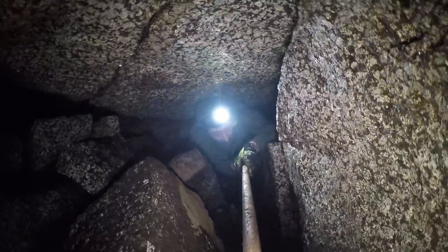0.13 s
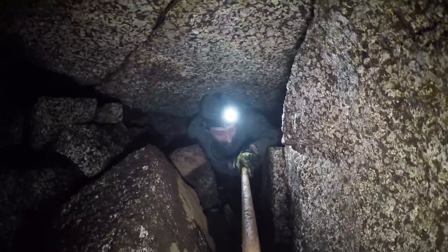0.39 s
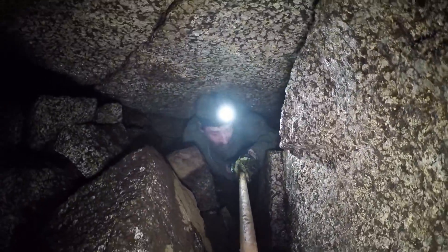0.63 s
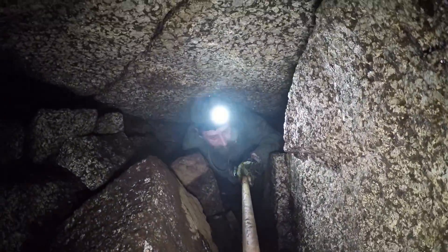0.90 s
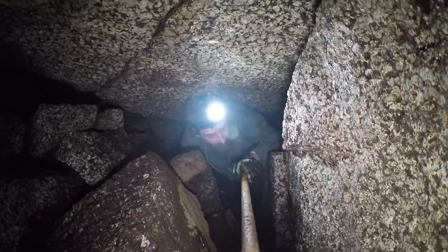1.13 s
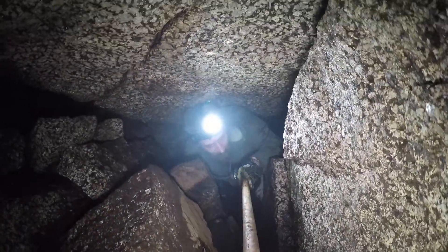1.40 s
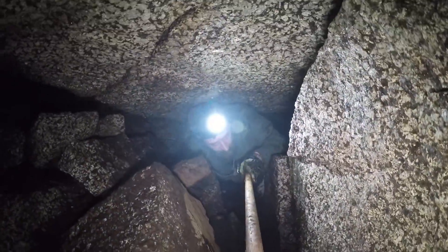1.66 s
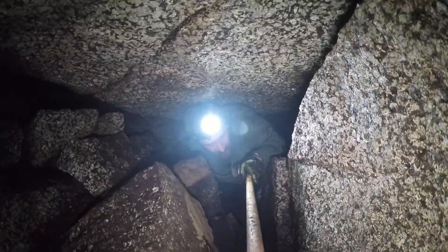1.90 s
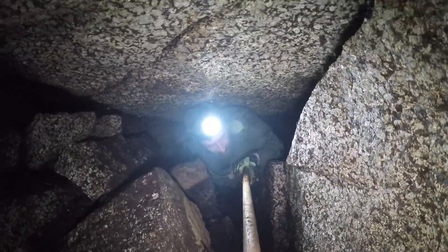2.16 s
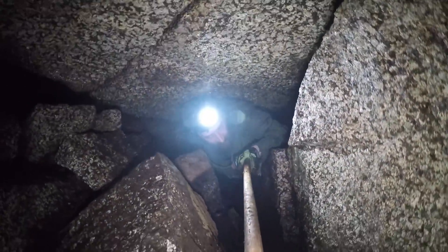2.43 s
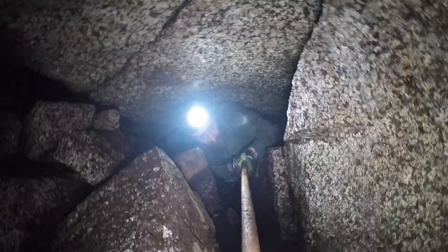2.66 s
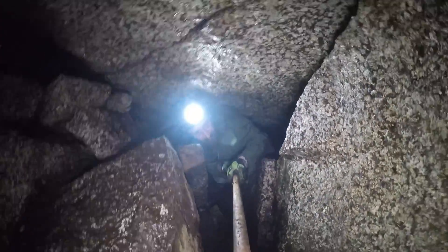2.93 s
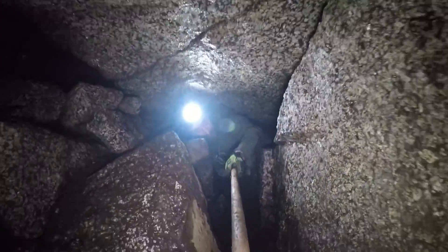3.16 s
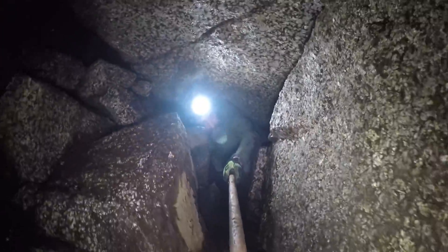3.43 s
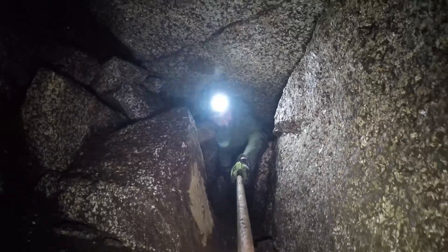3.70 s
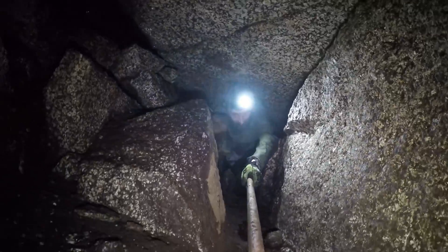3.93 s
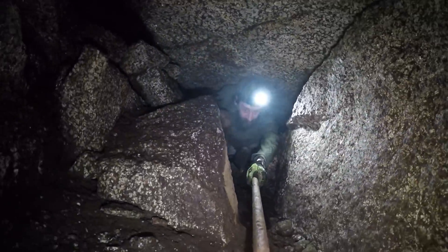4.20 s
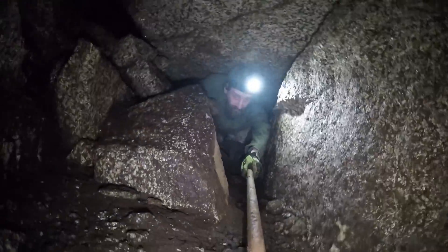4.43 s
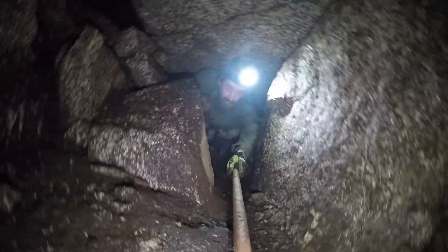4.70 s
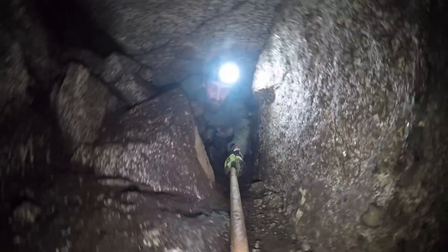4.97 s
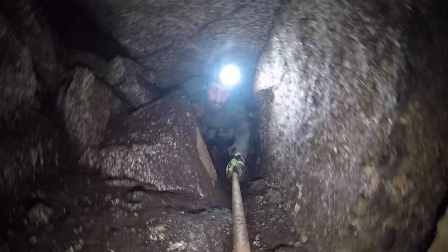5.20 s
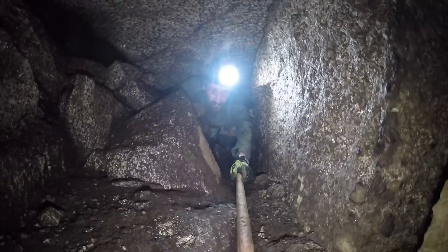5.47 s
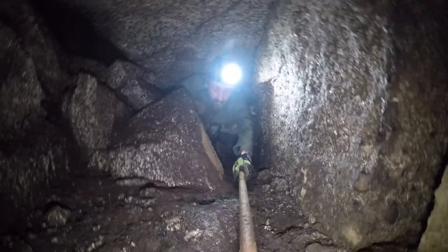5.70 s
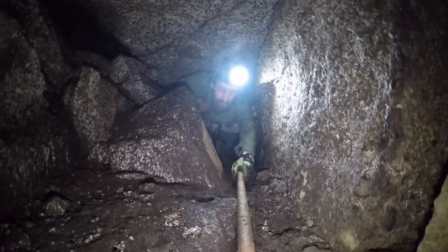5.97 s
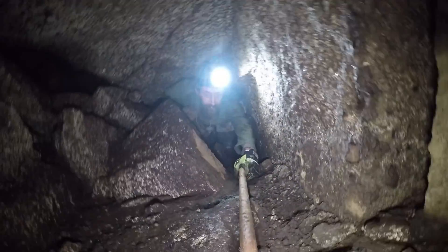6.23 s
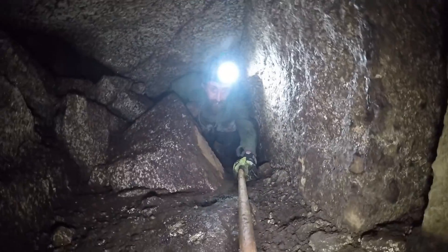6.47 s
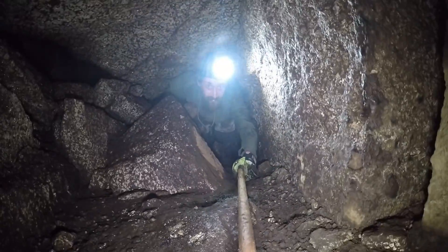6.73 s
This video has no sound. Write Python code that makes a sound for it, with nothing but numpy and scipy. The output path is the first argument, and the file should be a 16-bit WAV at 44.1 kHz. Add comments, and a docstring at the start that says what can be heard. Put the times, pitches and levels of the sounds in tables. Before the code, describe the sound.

Low pole rumble and muffled cloth scraping on rock in a cave, with scattered dull taps, then hard hollow knocks after four and a half seconds.

```python
"""A small camera on a hand-held pole is pushed through a tight rock passage, its microphone right at the rock.
Hiss swells in first, under the low sway and hum of the pole, the glove rubbing along it and clothing on stone;
all four go on throughout, as wavering tones and as lumpy, filtered noise. From the first second
blows ring the modes of pole, camera shell and fittings, some with noise bursts, chatter or judder; the hardest
come after four and a half seconds, the last ones near the end. Gain control ducks the sound after loud peaks."""
import sys
import numpy as np
from scipy import signal
from scipy.fft import rfft, irfft
from scipy.io import wavfile
from scipy.ndimage import uniform_filter1d

SR = 44100
rng = np.random.default_rng(int(sys.argv[2]) if len(sys.argv) > 2 else 0)


def volts_from_decibels(level):
    """Turn decibel levels (scalar or array-like) into linear amplitude factors."""
    exponent = np.asarray(level, float) / 20
    return 10 ** exponent


def inscribe(sig):
    """Save sig as 16-bit PCM at rate SR to the path in sys.argv[1].

    A 1-D sig is mono; a 2-D sig holds one channel per row.
    Samples are clipped to [-1, 1] before scaling.
    """
    pcm = np.round(np.clip(np.atleast_2d(sig).T, -1, 1) * 32767)
    wavfile.write(sys.argv[1], SR, pcm.astype(np.int16))


N = 302526

# bending modes of the pole: f/Hz, relative level/dB, t60/s
POLE_MODES = [(65, 0, .5), (103, -3, .16)]
# modes of the camera shell on its mount: f/Hz, relative level/dB, t60/s
SHELL_MODES = [(113, 8, 0.059), (175.5, -3, 0.16), (290.8, 1.5, 0.073), (342, 3.5, 0.043),
               (493, -11, 0.033), (660, 2, 0.04), (767, -1.5, 0.038), (1078, -0.5, .03), (1374, 2.5, 0.011),
               (1670, 1.5, 0.0088), (2300, -23, 0.018)]
# modes of clamp and screw: f/Hz, relative level/dB, t60/s
FITTING_MODES = [(1500, -5, .005), (2300, -7, .005), (3600, -7, .03), (3820, -7, .02), (4165, 2, .022),
                 (4460, 3, .02), (4900, -3, .015), (5700, -6, .012), (7000, -6, .012), (8390, 1, .015),
                 (8950, -3, .01), (12000, -13, .0015)]


def evened(x):
    """Scales to rms 1."""
    return x / np.sqrt(np.mean(x ** 2) + 1e-20)


def column(table, count):
    """One control of a curve table, drawn straight from row to row, sample by sample."""
    rows = np.array(table)
    return np.interp(np.arange(N) / SR, rows[:, 0], rows[:, count])


def coloured(x, points):
    """Filters x through a curve of (f/Hz, relative level/dB) points and evens it to rms 1."""
    f, db = np.transpose(points)
    hz = np.fft.rfftfreq(N, 1 / SR)
    curve_db = np.interp(np.log(hz + 1), np.log(f + 1), db)
    return evened(irfft(rfft(x) * volts_from_decibels(curve_db), N))


def drift(hz):
    """Slow chance of rms 1: noise that falls away above hz."""
    return coloured(rng.standard_normal(N), [(0, 0), (hz, 0), (2 * hz, -40), (SR, -200)])


def grit(per_s, spread_db, smooth):
    """Stick-slip: sparse catches of uneven size over a share of smooth sliding noise."""
    size = volts_from_decibels(spread_db * np.minimum(rng.exponential(1, N), 4))
    catches = size * rng.choice([-1., 1.], N) * (rng.random(N) < per_s / SR)
    return smooth * rng.standard_normal(N) + (1 - smooth) * evened(catches)


def strokes(table, count):
    """Gain through all strokes (start, length, ..): each swells, still gains a little, then dies away."""
    swell_share, rise_db = 0.35, 1  # share of the length spent swelling; further rise over the length
    die_s, die_share = 0.014, 0.083  # the dying takes a fixed time plus a share of the length
    t, power = np.arange(N) / SR, np.zeros(N)
    for row in table:
        u, length = t - row[0], row[1]
        swell = np.sin(np.pi / 2 * np.clip(u / (swell_share * length), 0, 1))
        rising = volts_from_decibels(row[count] + rise_db * np.clip(u / length, 0, 1))
        die = np.exp(-np.maximum(u - length, 0) / (die_s + die_share * length))
        power += (rising * swell * die) ** 2
    return np.sqrt(power)


def ringing(modes, seconds, spot=0, contact_s=0):
    """Decaying sines of a body after one tap, peak 1; the struck spot weights and slightly detunes each."""
    t = np.arange(int(seconds * SR)) / SR
    hz, db, t60 = np.transpose(modes)[:, :, None]
    spot = (spot * np.ones(12))[:len(modes), None]
    softening_db = -0.1 * hz * contact_s  # the longer the contact, the weaker the high modes
    mode_gain = volts_from_decibels(db + softening_db + 3 * spot - 60 * t / t60)
    y = (mode_gain * np.sin(2 * np.pi * hz * (1 + .005 * spot) * t)).sum(0)
    return y / abs(y).max()


def hum(hz, waver, waver_hz, throb_db):
    """A mode kept going by a trembling hand: its pitch wavers and its strength throbs."""
    turns = np.cumsum(hz * (1 + waver * drift(waver_hz))) / SR
    return np.sqrt(2) * volts_from_decibels(throb_db * drift(25.3)) * np.sin(2 * np.pi * turns)


def hiss():
    """Steady coloured noise under everything, swelling in at first."""
    # colour of the hiss: f/Hz, relative level/dB
    hiss_colour = [(180, -1), (300, -3.5), (1110, -16), (1670, -19.5), (10100, -29.5), (13800, -39),
                   (15000, -64)]
    level_db, start_db, swell_s = -50, -3.5, 0.51
    swell_db = start_db * np.exp(-np.arange(N) / SR / swell_s)
    return volts_from_decibels(level_db + swell_db) * coloured(rng.standard_normal(N), hiss_colour)


def shake():
    """The long pole in the hand sways, wobbles and bends: three low tones at its lowest modes."""
    # the pole in the hand: t/s, sway level/dB, wobble f/Hz, wobble level/dB, bending hum level/dB
    hand_curve = [(0.0, -46.5, 32.9, -37, -47), (0.88, -32.5, 29.34, -39, -51.5),
                  (1.51, -47, 31.3, -27.5, -39.5), (1.72, -26, 23.76, -36, -39.5),
                  (2.52, -44, 30.45, -29.5, -38.5), (2.98, -21.5, 25.95, -23.5, -32),
                  (3.36, -24, 30.7, -11, -38), (3.72, -26.5, 30.12, -23.5, -35.5),
                  (4.18, -28.5, 33.36, -30.5, -36), (4.76, -30.5, 31.1, -16.5, -31.5),
                  (4.93, -25, 25.44, -36, -37.5), (5.08, -18.5, 26.1, -38, -45),
                  (5.27, -29, 32.65, -24, -34.5), (5.67, -34, 36.85, -32, -21.5),
                  (5.92, -20, 25.66, -24, -24.5), (6.23, -36, 25.38, -45, -35),
                  (6.46, -16, 24.85, -21, -32.5), (6.86, -27, 25.3, -35, -37)]
    sway = volts_from_decibels(column(hand_curve, count=1)) * hum(14, .3, 4, 3.5)
    wobble = volts_from_decibels(column(hand_curve, count=3)) * hum(column(hand_curve, count=2), 0.059, 4.3, 2.6)
    bend = volts_from_decibels(column(hand_curve, count=4)) * hum(POLE_MODES[0][0], 0.0738, 11.82, 3.9)
    return sway + wobble + bend


def drag(count):
    """Level of one cloth layer (1 swish, 2 body, 3 fold): the steady rustle plus the drags."""
    # clothing that keeps rustling: t/s, swish level/dB, dull body level/dB, hollow fold level/dB
    rustle_curve = [(0.0, -75, -63, -85), (.5, -76, -48.5, -62), (1.0, -67, -60.5, -87),
                    (2.0, -57.5, -51.5, -73), (2.7, -61, -51, -75), (3.4, -62.5, -43.5, -73),
                    (3.7, -69.5, -60, -82), (4.2, -61.5, -66, -71), (4.75, -74, -51.5, -64),
                    (5.15, -78, -47, -75), (5.65, -68, -71, -82), (6.3, -79, -45, -64),
                    (6.86, -63.5, -51.5, -78)]
    # separate drags over stone: start t/s, length/s, swish level/dB, dull body level/dB, hollow fold level/dB
    drag_strokes = [(.30, 0.48, -56.5, -66, -63), (1.02, 0.56, -57, -44.5, -66),
                    (1.41, 0.089, -46, -36.5, -52), (1.51, 0.031, -38.5, -37, -44),
                    (1.79, 0.048, -50, -41, -50), (1.825, 0.03, -39.5, -38.5, -45),
                    (1.928, 0.032, -51.5, -38.5, -56), (1.3, 0.019, -54, -45, -82),
                    (2.115, 0.082, -62, -44.5, -54.5), (2.27, 0.12, -59.5, -38.5, -68),
                    (2.44, 0.046, -49.5, -53, -65), (2.54, 0.064, -49.5, -57, -78),
                    (2.76, 0.21, -58.5, -75, -103), (2.93, 0.26, -52, -43, -61),
                    (4.085, 0.03, -48, -51.5, -66.5), (4.37, 0.09, -53, -61, -75),
                    (4.405, 0.026, -50.5, -53, -49), (4.54, 0.051, -48.5, -29.5, -67),
                    (4.61, 0.057, -58, -43, -73), (5.7, 0.19, -59.5, -41.5, -72),
                    (5.953, 0.016, -44.5, -50, -80), (6.68, 0.017, -50, -66, -79)]
    return np.hypot(volts_from_decibels(column(rustle_curve, count=count)), strokes(drag_strokes, count=count + 1))


def cloth():
    """Fabric on rough stone: a fine swish, a coarser body and a hollow note follow the same drags."""
    # colour of the fine swish: f/Hz, relative level/dB
    swish_colour = [(1400, -26), (2600, -5.5), (3900, -1.5), (5100, -4.5), (7300, 0.5), (9500, -7),
                    (11500, -19), (15000, -41)]
    # colour of the dull body: f/Hz, relative level/dB
    body_colour = [(250, -1), (420, 0), (680, -3), (1150, -14.5), (1900, -18.5), (2300, -18.5), (6000, -47)]
    # air ringing in a fold of cloth: f/Hz, relative level/dB
    fold_colour = [(700, -50), (1400, -16), (1720, 0), (2050, -16), (4000, -50)]
    swish = volts_from_decibels(1.16 * drift(64)) * coloured(grit(2500, 1.7, 0.54), swish_colour)
    coarse = volts_from_decibels(1.1 * drift(29)) * grit(250, 2.14, 0.62)
    body = coloured(coarse, body_colour)
    fold = coloured(coarse, fold_colour)
    return drag(count=1) * swish + drag(count=2) * body + drag(count=3) * fold


def grip():
    """The glove creeps on the pole in lumpy slips that travel up to the camera."""
    # the glove creeping: t/s, rub level/dB
    creep_curve = [(0.0, -48.5), (.55, -43), (.8, -49), (1.5, -51), (1.67, -39.5), (2.9, -36), (3.2, -39.5),
                   (3.76, -47), (4.37, -50), (4.48, -87), (4.7, -39.5), (5.15, -37.5), (5.3, -36.5),
                   (5.47, -45), (5.58, -36.5), (5.68, -26.5), (6.02, -42.5), (6.34, -34.5), (6.86, -38.5)]
    # sudden slips of the glove: start t/s, length/s, rub level/dB
    slip_strokes = [(.84, 0.046, -39), (1.53, 0.096, -32.5), (1.82, 0.033, -27.5), (1.94, 0.0082, -24),
                    (4.38, 0.042, -40), (5.69, 0.16, -17), (6.35, 0.034, -28)]
    # colour of the rub at the microphone: f/Hz, relative level/dB
    rub_colour = [(15, -52), (42, -11.5), (100, 4), (230, -6.5), (410, -15.5), (520, -32.5), (700, -28),
                  (1500, -43), (4000, -100)]
    rub_gain = np.hypot(volts_from_decibels(column(creep_curve, count=1)), strokes(slip_strokes, count=2))
    return rub_gain * volts_from_decibels(3.0 * drift(17.2)) * coloured(grit(150, 2.5, 0.62), rub_colour)


def judder():
    """The camera judders on its mount: uneven catches tap the shell and ring its low and high modes."""
    # judders: start t/s, length/s, low shell modes drive/dB, high shell modes drive/dB
    judder_strokes = [(1.535, 0.064, -31, -57), (1.6, 0.039, -42, -47), (1.725, 0.015, -39, -72),
                      (2.95, 0.077, -39, -37), (3.04, 0.052, -40, -40.5), (3.1, 0.12, -41.5, -36),
                      (3.225, 0.046, -36, -37), (4.545, 0.021, -24, -17.5), (4.565, 0.025, -19, -47),
                      (4.655, 0.013, -32.5, -43), (5.384, 0.0049, -22.5, -36), (5.486, 0.0038, -21, -30.5),
                      (5.547, 0.019, -37, -59), (5.587, 0.028, -32, -45), (6.362, 0.023, -22, -35)]
    catches = uniform_filter1d(grit(300, 4.1, 0.23), size=16)
    low, high = ringing(SHELL_MODES[1:5], .1), ringing(SHELL_MODES[5:], .06)
    out = np.zeros(N)
    for count, ring in ((2, low), (3, high)):
        taps = strokes(judder_strokes, count=count) * catches
        out += signal.oaconvolve(taps, ring / np.linalg.norm(ring))[:N]
    return out


def chatter():
    """The mount chatters while the pole is pressed along rock: one wavering pitch grows, then dies."""
    # chatters: start t/s, length/s, pitch f/Hz, level/dB
    chatter_bursts = [(1.53, 0.019, 400, -31.5), (2.938, 0.011, 250, -29.5), (4.512, 0.024, 626, -11),
                      (4.526, 0.0095, 769, -17), (4.531, 0.007, 290, -5.5), (4.533, .018, 182, -8.5),
                      (5.732, 0.15, 100, -13), (6.356, 0.023, 221, -15)]
    pitch_spread, grow_power, die_cycles = 0.0387, 2.5, 3.2
    t, out = np.arange(N) / SR, np.zeros(N)
    waver = 1 + pitch_spread * drift(42.4)
    for s, length, hz, db in chatter_bursts:
        u = t - s
        grow = np.sin(np.pi / 2 * np.clip(u / length, 0, 1)) ** grow_power
        die = np.exp(-np.maximum(u - length, 0) * hz / die_cycles)
        out += volts_from_decibels(db) * grow * die * np.sin(2 * np.pi * hz * np.cumsum(waver) / SR)
    return np.sqrt(2) * out


def noise_bursts():
    """Short bursts of noise that swell over a few ms and quickly die, ringing shell (first) and fittings."""
    # noise bursts: peak t/s, camera shell drive/dB, metal fittings drive/dB
    burst_list = [(2.941, -17.5, -53), (4.534, 6, -31.5), (5.204, -6, -14), (5.73, -26, -62),
                  (5.802, -22, -35), (6.369, -9, -49)]
    swell_s, die_s = 0.008, 0.0042
    shell, direct = np.zeros((2, N + 8192))
    t = np.arange(-2048, 1024) / SR
    for s, shell_db, fittings_db in burst_list:
        start = round(s * SR) - 2048
        noise = rng.standard_normal(3072)
        burst = noise * np.exp(np.where(t < 0, t / swell_s, -t / die_s))
        dulled = uniform_filter1d(uniform_filter1d(burst, size=20), size=14)
        band = dulled - uniform_filter1d(burst, size=80)
        shell[start:start + 3072] += volts_from_decibels(shell_db) * np.gradient(band)
        clink = signal.fftconvolve(.3 * burst, ringing(FITTING_MODES, .06, noise[:12]))
        direct[start:start + len(clink)] += volts_from_decibels(fittings_db) * clink
    return shell, direct


def blows():
    """Blows push on shell and pole (returned first) and clink; long soft contacts drive mainly low modes."""
    # blows on the pole: t/s, shell drive/dB, pole bending drive/dB, metal fittings drive/dB, contact time/s
    blow_list = [(0.856, -26.5, -24, -70, 0.0016), (1.55, -17.5, -38, -58, 0.0029),
                 (2.332, -32, -17.5, -62, 0.0041), (2.609, -27, -20.5, -57, 0.0009),
                 (2.941, -19.5, -23, -60, 0.001), (3.25, -23, -15, -56, 0.001),
                 (3.305, -27.5, -29, -62, 0.00065), (3.869, -61, -44, -40, 0.00016),
                 (3.91, -61, -66, -41, 0.00049), (4.533, -11, -37, -28, 0.00032),
                 (4.537, 1, 3.5, -26, 0.0022), (4.575, -7, -44, -44, 0.0036),
                 (4.59, -10.5, -42.5, -35, 0.0014), (4.655, -16.5, -32.5, -46, 0.0033),
                 (5.2058, 1.5, -26, -8, 0.000543), (5.2072, 7, -3.5, -14, 0.0012),
                 (5.2107, -8.5, -18.5, -12, 0.001), (5.38, -2.5, -9.5, -32, 0.0031),
                 (5.482, -6.5, -12, -34, 0.00397), (5.549, -17.5, -48, -69, 0.0028),
                 (5.73, -17, -15, -45, 0.0036), (5.797, -3, -3, -18, 0.0033),
                 (5.799, -41, -40, -18, 0.00044), (5.806, -15.5, -0.5, -35, 0.0014),
                 (5.831, -2.5, -27, -29.5, 0.0035), (5.858, -8, 0, -31.5, 0.0046),
                 (6.367, -26, -7, -36.5, 0.0016), (6.379, -21, -30, -38, 0.0027)]
    crack_db, crack_s = 1, 0.0037  # dry snap of metal on stone: drive relative to the fittings, decay time
    shell, pole, direct = np.zeros((3, N + 8192))
    t = np.arange(-2048, 1024) / SR
    for s, shell_db, pole_db, fittings_db, contact_s in blow_list:
        start = round(s * SR) - 2048
        at = slice(start, start + 3072)
        noise = rng.standard_normal(3072)
        push = np.sin(np.pi * np.clip(t / contact_s, 0, 1)) ** 2
        rebound = np.sin(np.pi * np.clip((t / contact_s - 1.3) / 1.76, 0, 1)) ** 2
        shell[at] += volts_from_decibels(shell_db) * push / push.sum()
        pole[at] += volts_from_decibels(pole_db) * push / push.sum()
        # the microphone itself is shoved and springs back
        direct[at] += volts_from_decibels(shell_db + 1.0) * (push - 0.54 * rebound)
        snap = uniform_filter1d(noise, size=3) - uniform_filter1d(noise, size=30)
        snap_shape = np.clip(t / contact_s, 0, 1) * np.exp(-t / crack_s)
        direct[at] += volts_from_decibels(fittings_db + crack_db) * snap * snap_shape
        after_rattle = 0.075 * noise * (t > 0) * np.exp(-t / 0.006)
        rattle = noise * push / np.linalg.norm(push) + after_rattle
        clink = signal.fftconvolve(rattle, ringing(FITTING_MODES[2:], .06, noise[:12], contact_s))
        direct[start:start + len(clink)] += volts_from_decibels(fittings_db) * clink
    return shell, pole, direct


def knocks():
    """Blows and noise bursts ring the modes of the camera shell, and the blows those of the pole."""
    blow_shell, pole, blow_direct = blows()
    burst_shell, burst_direct = noise_bursts()
    out = blow_direct + burst_direct
    out += signal.oaconvolve(blow_shell + burst_shell, ringing(SHELL_MODES, .2))[:len(out)]
    out -= signal.oaconvolve(pole, ringing(POLE_MODES, .8))[:len(out)]
    return uniform_filter1d(out[:N], size=2)  # the housing softens the very top


def scene():
    """All sounds reach one microphone, most of them through the pole."""
    return (hiss() + shake() + cloth() + grip() + judder() + chatter() + knocks())[None]


def roll_off(x):
    """The treble ends steeply here."""
    return signal.sosfilt(signal.butter(12, 15730, fs=SR, output="sos"), x)


def record(dry):
    """Gain control falls within a few ms on peaks and recovers slowly; a soft ceiling; the band edge."""
    peak_db = 20 * np.log10(abs(dry[0]) + 1e-9)
    fall = np.arange(N) * 80. / SR  # the held peak sinks by 80 dB a second
    held_db = np.maximum.accumulate(peak_db + fall) - fall
    over_db = np.maximum(held_db + 5, 0)  # excess above -5 dB
    # six tenths of the excess is taken off, averaged over the 150 samples or so just gone
    ducked = dry / volts_from_decibels(.6 * uniform_filter1d(over_db, size=150, origin=70))
    ceiling = .97 * np.tanh(ducked / .97)
    edge = signal.firwin(255, 15250, window=("kaiser", 9), fs=SR)  # low-pass at 15250 Hz
    padded = np.pad(ceiling, ((0, 0), (127, 127)), "edge")
    mix = signal.oaconvolve(padded, edge[None], "valid")
    return roll_off(mix)


dry = scene()
out = record(dry)
inscribe(out)
```